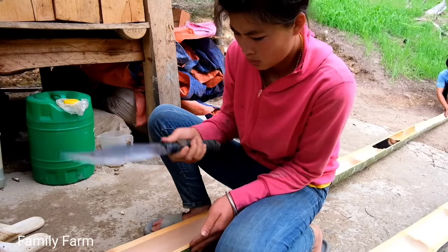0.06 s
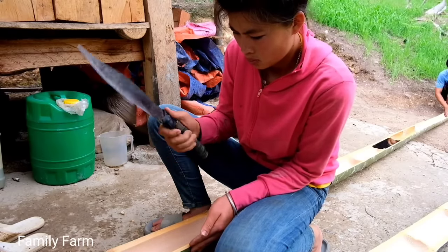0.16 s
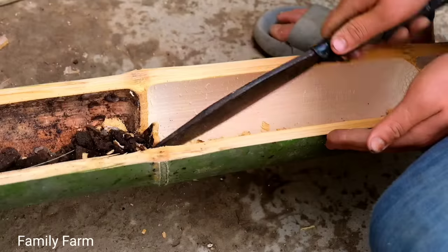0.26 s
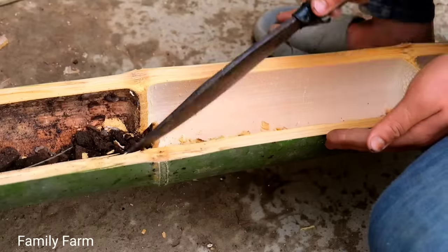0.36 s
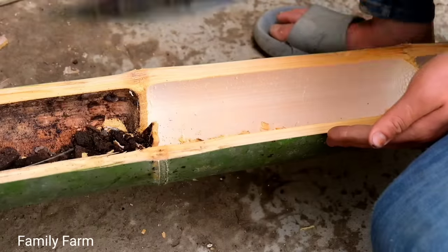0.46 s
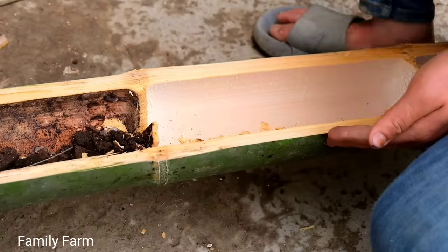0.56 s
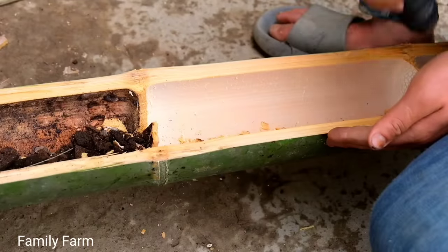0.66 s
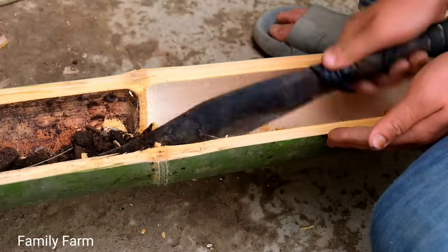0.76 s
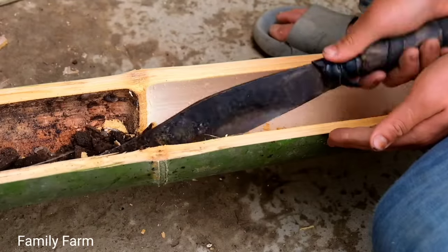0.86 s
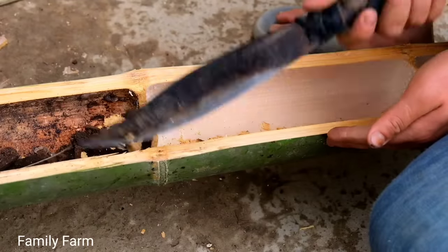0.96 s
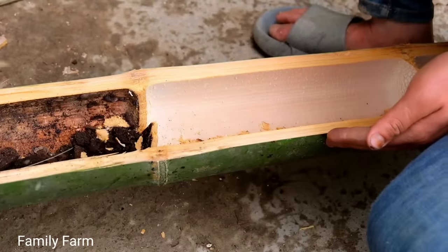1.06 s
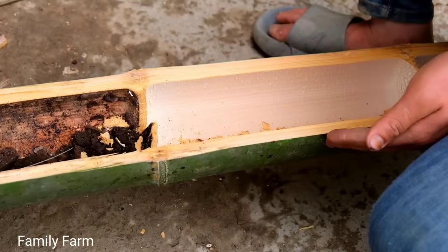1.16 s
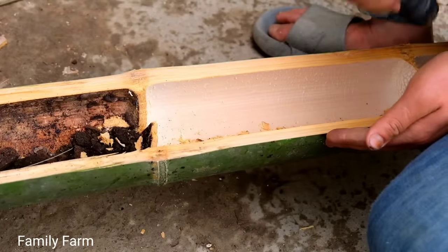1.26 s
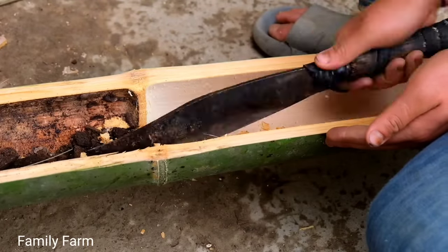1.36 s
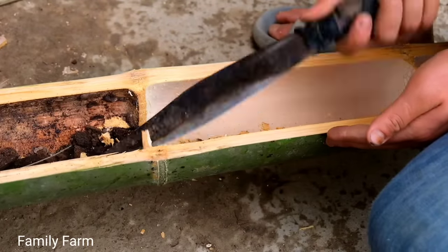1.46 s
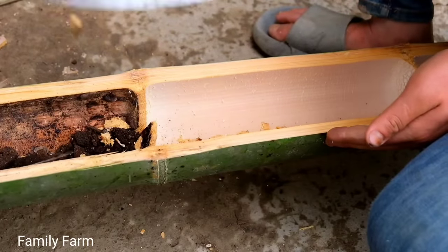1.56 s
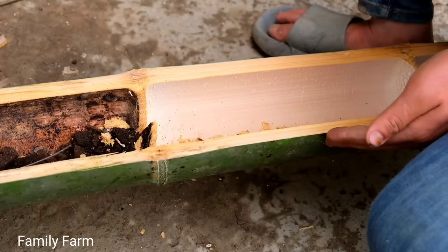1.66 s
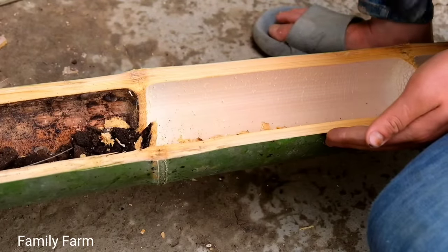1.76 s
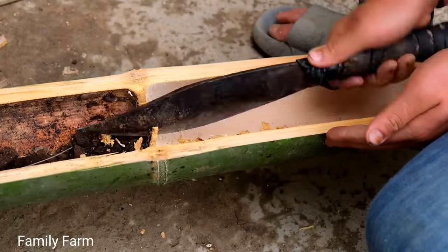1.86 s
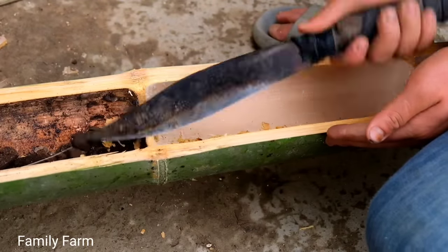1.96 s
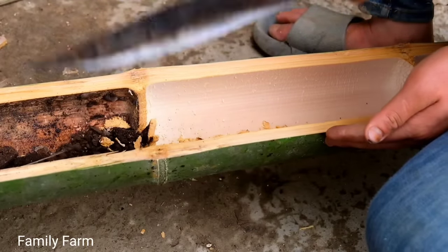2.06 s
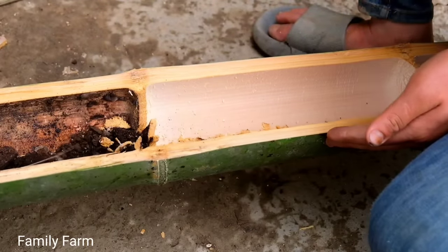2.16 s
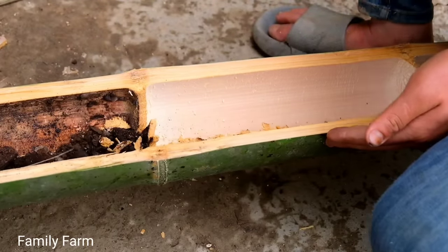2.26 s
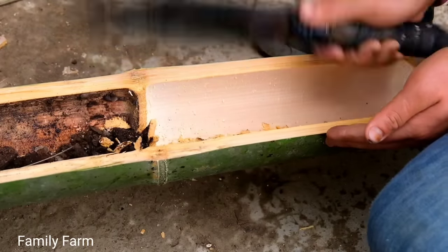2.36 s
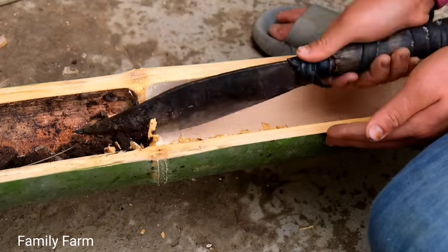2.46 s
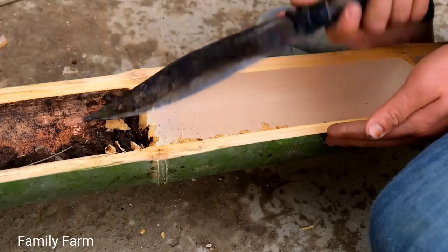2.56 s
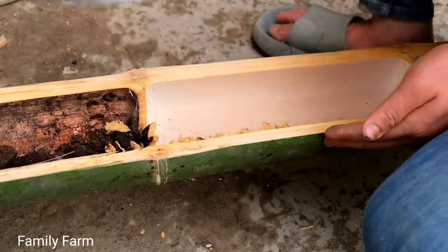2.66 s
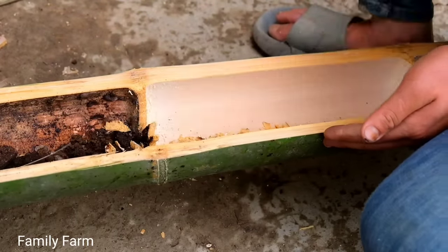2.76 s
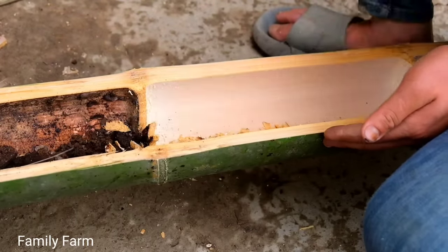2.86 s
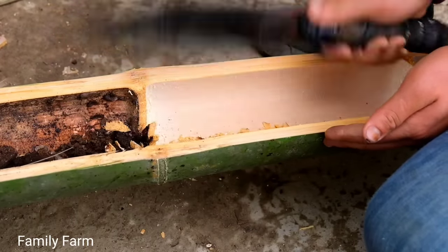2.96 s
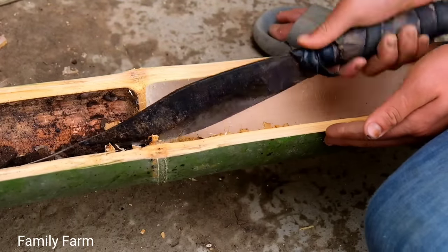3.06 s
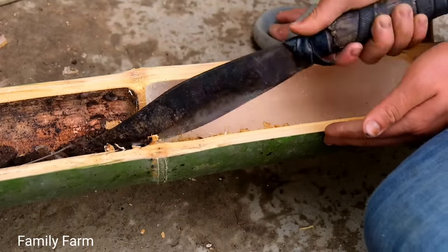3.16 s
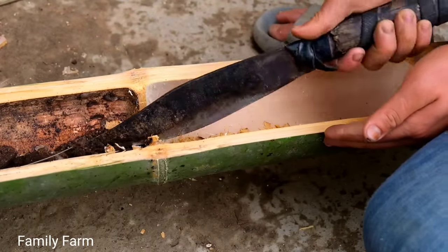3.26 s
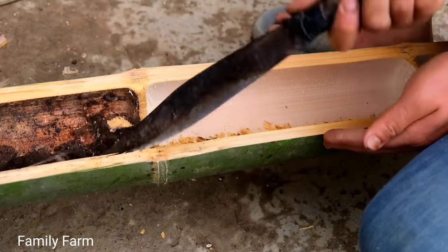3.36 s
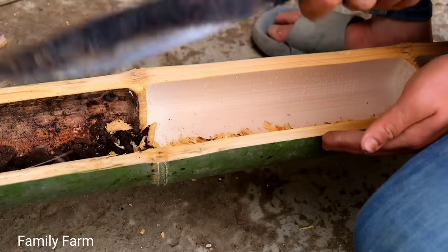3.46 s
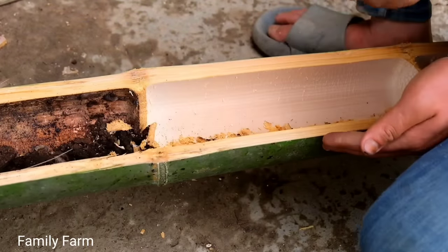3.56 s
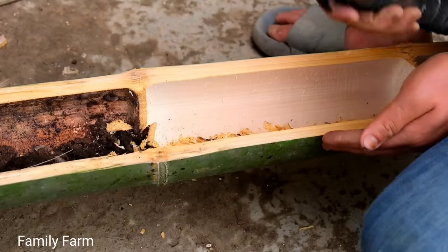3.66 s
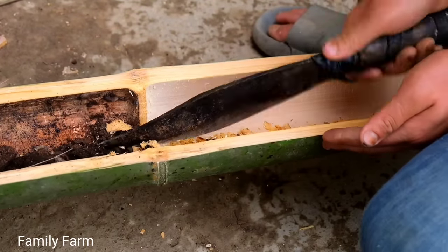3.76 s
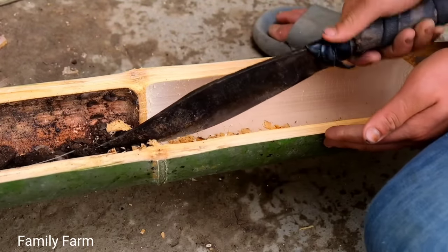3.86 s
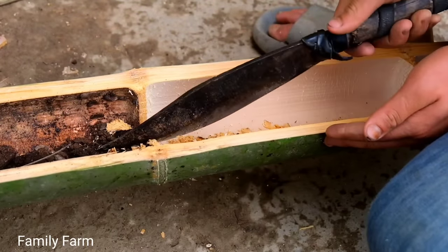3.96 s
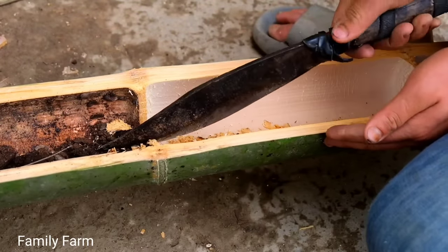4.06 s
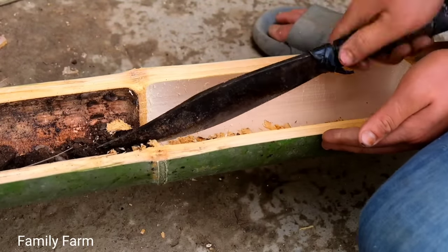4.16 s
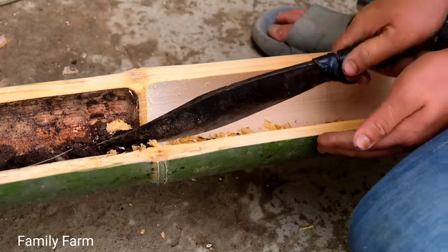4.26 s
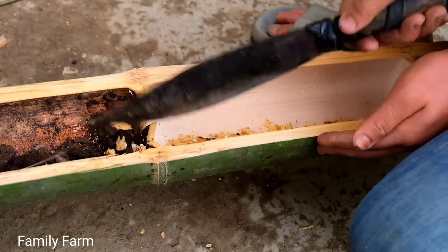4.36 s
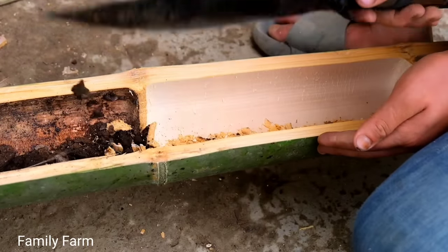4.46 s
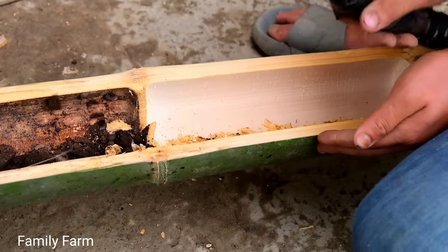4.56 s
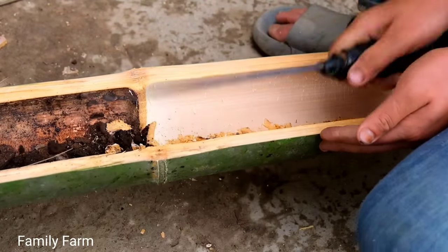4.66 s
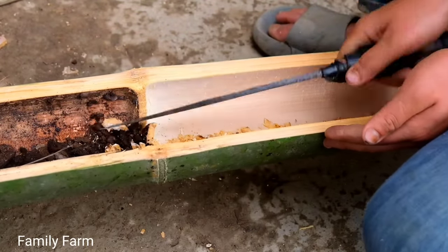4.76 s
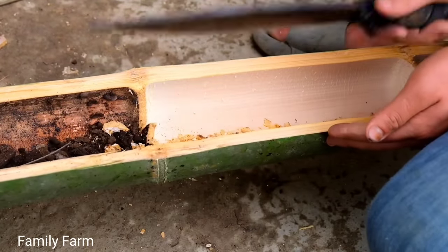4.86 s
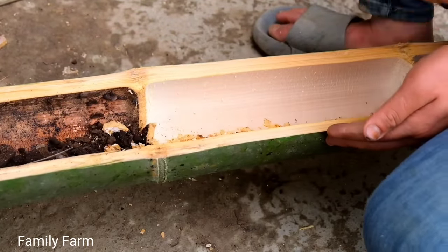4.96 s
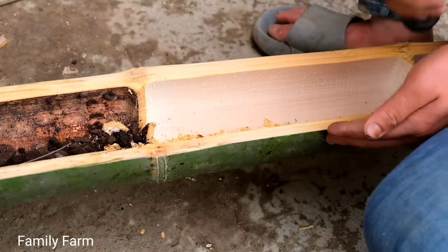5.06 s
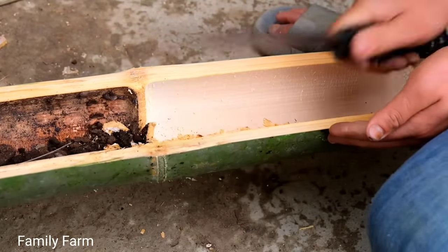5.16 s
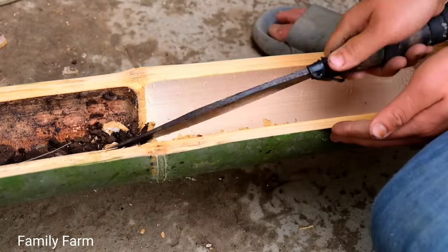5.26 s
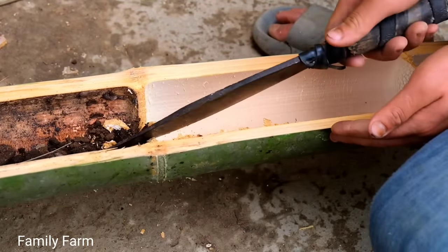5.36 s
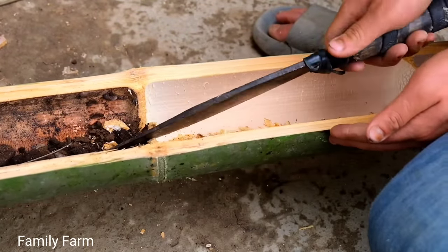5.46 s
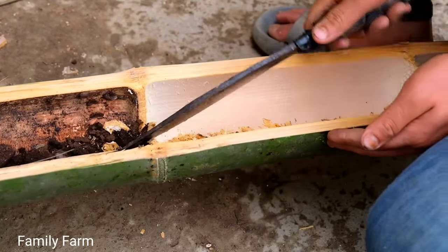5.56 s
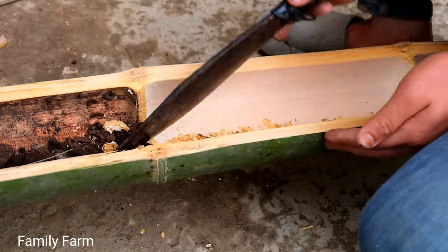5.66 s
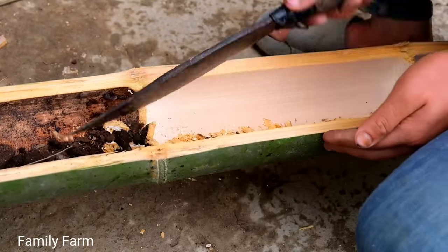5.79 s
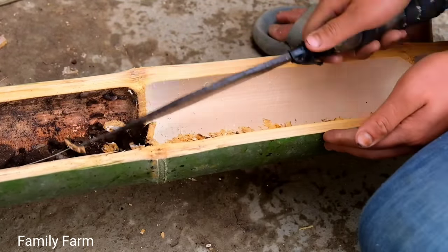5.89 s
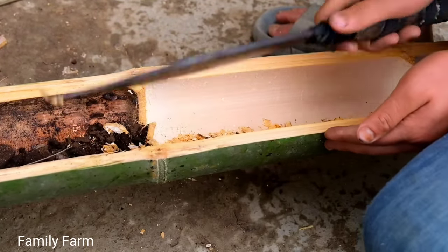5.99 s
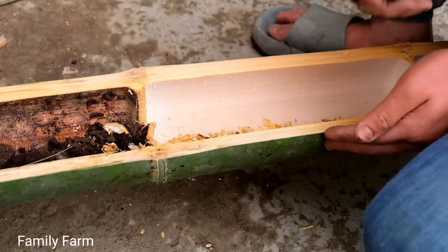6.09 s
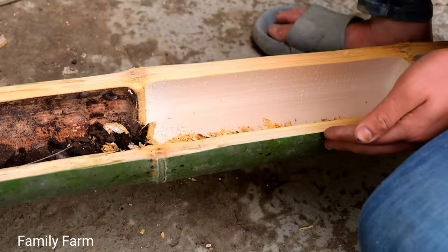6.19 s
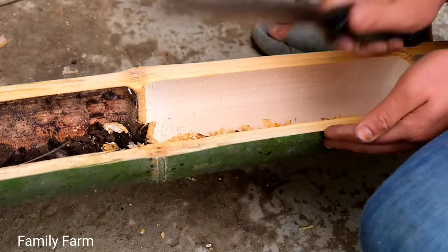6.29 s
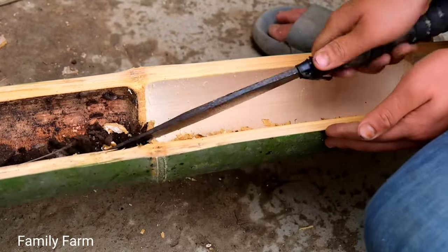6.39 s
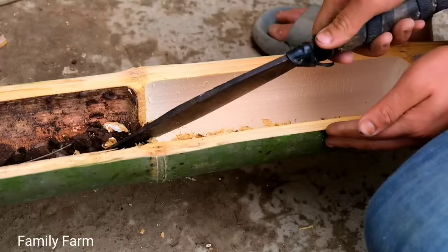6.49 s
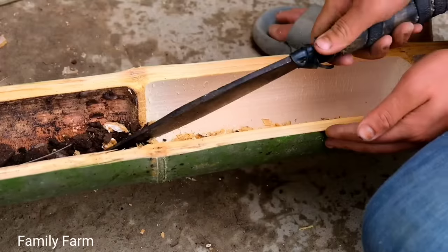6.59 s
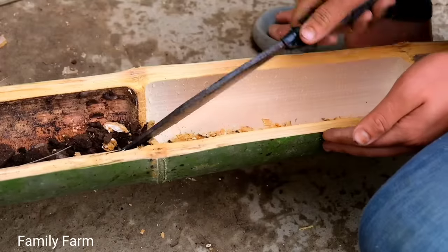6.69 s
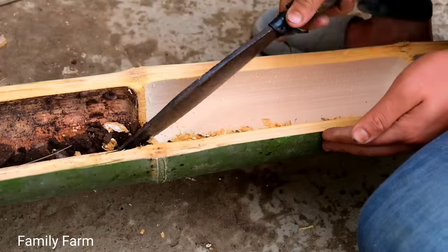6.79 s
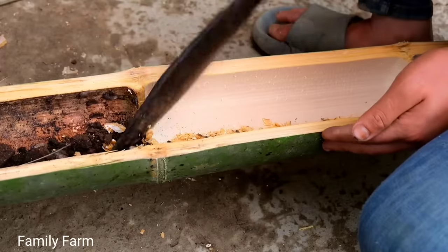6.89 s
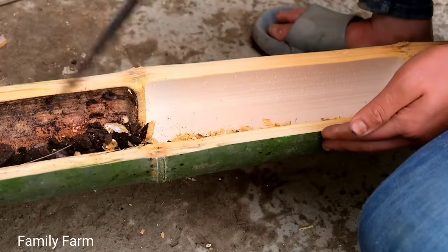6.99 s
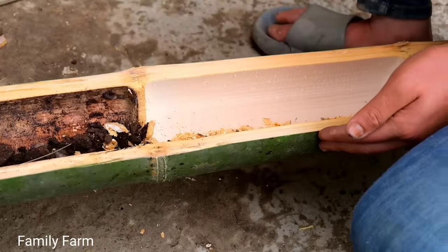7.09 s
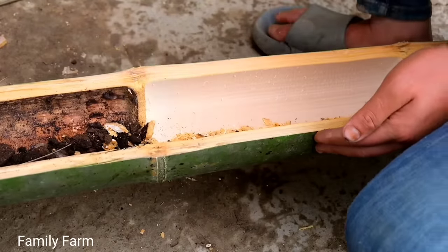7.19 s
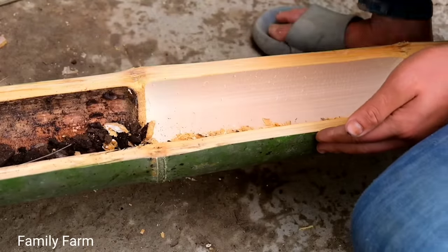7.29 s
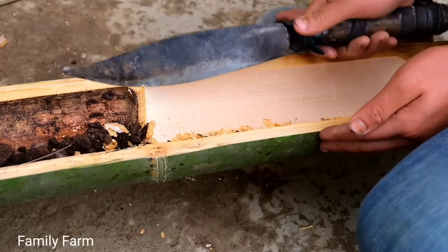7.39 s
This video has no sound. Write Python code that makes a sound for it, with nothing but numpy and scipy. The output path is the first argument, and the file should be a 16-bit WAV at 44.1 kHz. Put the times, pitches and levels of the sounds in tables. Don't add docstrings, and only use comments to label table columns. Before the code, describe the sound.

Outdoors in a concrete yard, a heavy blade strikes a hollow bamboo pole close to the microphone. Hard, abrupt cracks alternate with duller, slightly more distant knocks, roughly two main hits per second, with loose taps, gritty ticks and short fibre scrapes between. Insects, leaves and a low murmur stay faint, ducking after each blow. A cricket chirps midway and a hen clucks softly once.

```python
import sys
import numpy as np
from scipy import signal
from scipy.fft import rfft, irfft
from scipy.io import wavfile
from scipy.ndimage import uniform_filter1d

SR = 44100
rng = np.random.default_rng(int(sys.argv[2]) if len(sys.argv) > 2 else 0)


def how_loud(loudness_db):
    steps = np.asarray(loudness_db, float) / 20
    return 10 ** steps


def unload_audio(sound):
    columns = np.transpose(np.atleast_2d(sound))
    steps = np.round(np.clip(columns, -1, 1) * 32767)
    wavfile.write(sys.argv[1], SR, steps.astype(np.int16))


N = 327663

# pitch_hz, level_db
MURMUR = [(15, -51.5), (25, -21.5), (91, 1), (128, -10.5), (258, -2.5), (371, -5.5), (521, 2), (763, -2.5),
          (964, -1), (1640, -6.5), (2350, -9), (4000, -22), (5200, -39), (8800, -120)]
# pitch_hz, level_db
INSECTS = [(3600, -22), (4700, -4.5), (5300, -7), (6000, 1), (6750, -7), (7500, 1), (8330, -2.5),
           (8460, -29.5)]
# pitch_hz, level_db
LEAVES = [(1410, -31.5), (2400, -4.5), (3660, -6), (8330, -7), (8480, -15), (11000, -20.5), (15100, -29.5),
          (15800, -44)]
# pitch_hz, likeness (1 = same)
LIKENESS = [(60, 1), (180, 1.0), (550, 1), (1650, 0.39), (4970, -0.25), (15000, 1)]
# start_s, depth_db
GAIN_DIPS = [(-.07, 17.5), (0.36, 20), (0.85, 16.5), (1.12, 13), (1.384, 16.5), (1.526, 21), (1.95, 23.5),
             (2.115, 19), (2.45, 19), (2.651, 21), (3.034, 20), (3.273, 16), (3.429, 16.5), (3.849, 20),
             (4.321, 21), (4.791, 20.5), (5.0, 13), (5.246, 22.5), (5.509, 22), (5.895, 19), (5.979, 15.5),
             (6.253, 21), (6.389, 19), (6.532, 17.5), (6.895, 18.5), (7.041, 17)]
# start_s, hardest_s,
# end_s, body_db, rasp_db
SCRAPES = [(0.239, 0.288, 0.293, -39, -63.5), (2.568, 2.594, 2.645, -35, -37.5),
           (5.639, 5.686, 5.75, -48.5, -48.5), (5.725, 5.775, 5.85, -56, -41.5),
           (5.775, 5.845, 5.892, -37, -49), (6.332, 6.396, 6.387, -34.5, -52),
           (0.814, 0.83, 0.9, -50, -38.5), (0.163, 0.168, 0.16, -72, -56), (2.505, 2.52, 2.5, -62, -50.5),
           (3.168, 3.177, 3.19, -60.5, -53), (6.89, 6.914, 7.13, -60.5, -44.5)]
# start_s, hardest_s, end_s, body_db, rasp_db
FAR_SCRAPES = [
    (0.315, 0.342, 0.356, -43, -39.5),
    (1.127, 1.127, 1.116, -34, -42),
    (4.313, 4.319, 4.36, -37, -26.5),
    (4.752, 4.761, 4.8, -23.5, -38),
    (3.262, 3.271, 3.25, -40, -42),
    (4.891, 4.92, 4.99, -42, -42.5),
    (5.499, 5.503, 5.55, -41, -39),
    (6.24, 6.246, 6.265, -41, -30),
    (6.884, 6.891, 6.9, -35, -27.5),
]
# start_s, level_db, crack_db, edge_db, pitch_hz
TICKS = [(0.335, -37, -14, -52, 524), (0.926, -37.5, -16, -33.5, 536), (0.974, -37.5, -12, -28.5, 690),
         (1.465, -48.5, 6.5, -26, 616), (1.967, -39, -19, -11.5, 611), (1.996, -37.5, -1, -27, 693),
         (3.145, -52.5, -0.5, -18, 754), (3.367, -34, -0.5, -18, 635), (3.506, -42.5, -39, -34.5, 960),
         (5.662, -38.5, -14, -24.5, 904), (5.678, -35, -13, -13, 625), (5.732, -45.5, -4.5, -21, 533),
         (6.731, -34, -0.5, -23, 897), (6.793, -44.5, -3, 0, 1220), (7.329, -46, 1, -17, 985)]
# start_s, level_db, crack_db, edge_db, pitch_hz
KNOCKS = [(0.36, -7, -23.5, -15.5, 541), (1.127, -25, -29, -42, 732), (1.526, -8, -31, -30, 555),
          (2.115, -6.5, -21.5, -10, 536), (2.651, -10, -23.5, -23, 669), (2.907, -32, -29.5, -26.5, 660),
          (3.273, -11, -13.5, -18.5, 770), (3.851, -11, -47, -21.5, 735), (4.323, -4.5, -41, -16, 713),
          (4.792, -9.5, -38, -36.5, 693), (4.934, -25, -32, -9, 705), (5.028, -40, -17.5, -3, 991),
          (5.094, -37.5, -34.5, -21.5, 676), (5.509, -10, -27.5, -23, 700), (6.253, -9, -19, -41, 547),
          (6.532, -26, -11, -15, 978), (6.895, -9, -18.5, -20.5, 991)]
# start_s, level_db, crack_db, edge_db, pitch_hz
CHOPS = [
    (0.808, 4, -13, -24.5, 735),
    (1.383, 2, -3, -24.5, 593.5),
    (1.898, -2.5, 1.5, -21.5, 815),
    (2.45, 7, -14.5, -31.5, 582),
    (3.034, 3.5, -8.5, -27, 557.5),
    (3.814, 5.5, -27.5, -31.5, 887),
    (5.246, 2.5, -7.5, -32.5, 981),
    (6.389, 0, -20, -35, 852),
    (7.4278, -0.5, -18.5, -26, 1341),
]
# start_s, level_db, crack_db, edge_db, pitch_hz
TAPS = [
    (2.589, -18.5, -16, -33.5, 504),
    (2.603, -24.5, -17.5, -16.5, 1180),
    (3.429, -19, -22.5, -47, 462),
    (4.753, -10, -14.5, -55, 670),
    (5.807, -29, -21, -42, 690),
    (5.838, -25.5, -38.5, -52, 930),
    (5.895, -21.5, -16, -19, 474),
    (5.978, -20.5, -22, -60, 475),
    (7.042, -29, 0.5, -17.5, 3410),
]
# pitch_hz, level_db, die_away_s (to -60 dB)
TUBE = [(228, -25, .04), (310, -2.5, 0.013), (434.2, 14.5, 0.3)]
# pitch_hz, level_db, die_away_s
WALL = [(570, -6, 0.092), (670, -4, 0.05), (741.4, -2, 0.13), (837, -3, 0.089), (925.3, -1, 0.072),
        (1074, -14.5, 0.27), (1220, -8, 0.16), (1381, -5.5, 0.014), (1780, -3.5, 0.03), (1890, -10, 0.041),
        (2183, -14, 0.046)]
# pitch_hz, level_db, die_away_s
BLADE = [(4970, -2.5, .06), (5282, 1.5, 0.043), (7050, -6.5, 0.035), (8980, 0.5, 0.014), (10760, 4, 0.027),
         (11100, -1, 0.019), (13900, -1, 0.085), (17100, -6, .03)]
# pitch_hz, level_db, die_away_s
SPINE = [(11050, 1, .16), (13750, -6, .1)]
# pitch_hz, level_db, die_away_s
GRIT = [(9480, -3, .01), (10220, -2.5, .01), (11000, -6, 0.11), (12200, -2, .01), (12400, 8, .01),
        (13750, -5, .07), (14640, 7, .01)]
# pitch_hz, level_db, die_away_s
RIM = [(1675, 1, 0.069), (1720, 5, 0.027), (2074, 5, 0.065), (2430, -0.5, 0.014), (2710, -0.5, 0.024),
       (2764, -6, 0.18)]
# pitch_hz, level_db
CRACK = [(500, -19), (1500, 2), (2500, -1), (5000, -3.5), (8000, -10), (12000, -16.5), (15500, -25.5),
         (17000, -32)]
# pitch_hz, level_db
AIR = [(1000, 0), (2500, -3), (5000, -6), (8000, -10), (11000, -12.5), (16000, -16)]
# start_s, level_db
CHIRPS = [
    (4.025, -1.5),
    (4.1, 0),
    (4.185, -1.5),
    (4.275, -6),
    (4.36, -7.5),
    (4.455, -4),
    (4.535, -0.5),
    (4.62, -0.5),
]
# length_s, start_hz, end_hz, blur_samples
TRILL = (0.061, 4170, 5700, 29)
# length_s, start_hz, end_hz, blur_samples
ANSWER = (0.058, 6850, 6700, 150)
# time_s, pitch_hz, level_db
HEN = [
    (4.54, 371, -58),
    (4.585, 365, -50.5),
    (4.61, 356.6, -41.5),
    (4.628, 362, -66),
]
# pitch_hz, lead_radians
LEAD = [(50, .05), (500, 0.15), (1500, 0.8), (3000, 1.24), (8000, 1.4), (15000, 1.4)]
# pitch_hz, level_db
MIC_TREBLE = [(15300, -1), (16500, -16)]
# pitch_hz, die_away_s
ECHO = [(200, 0.075), (700, 0.2), (2000, 0.2), (6000, 0.09), (14000, 0.043)]


def evened(x):
    return x / np.sqrt(np.mean(x ** 2) + 1e-20)


def topped(x):
    return x / (abs(x).max() + 1e-20)


def read(points, hz):
    f, value = np.transpose(points)
    return np.interp(np.log(hz + 1), np.log(f + 1), value)


def add(mix, start_s, sound):
    part = mix[round(start_s * SR):][:len(sound)]
    part += sound[:len(part)]


def coloured(x, points):
    gain = how_loud(read(points, np.fft.rfftfreq(len(x), 1 / SR)))
    return irfft(rfft(x) * gain, len(x))


def dips():
    sudden_s, sudden_db = 0.293, 14
    climb_db_per_s = 54
    start_s, depth_db = np.transpose(GAIN_DIPS + [(sudden_s, sudden_db)])[:, :, None]
    fall_s = np.where(start_s == sudden_s, 0.003, 0.066)
    at = np.arange(0, N + 64, 64)
    since_s = at / SR - start_s
    left_db = depth_db - climb_db_per_s * np.maximum(since_s - fall_s, 0)
    lost_db = np.clip(since_s / fall_s, 0, 1) * np.maximum(left_db, 0)
    return np.interp(np.arange(N), at, lost_db.max(0))


def wash(points, level_db, patchy_db):
    frames, hz = N // 256 + 5, np.fft.rfftfreq(1024, 1 / SR)
    a, b, c, d, patches = rng.standard_normal((frames, 513, 5)).T
    patches = uniform_filter1d(patches, size=10, axis=0)
    patches = evened(uniform_filter1d(patches, size=12, axis=1))
    same = np.clip(read(LIKENESS, hz), -1, 1)[:, None]
    left, other = a + 1j * b, c + 1j * d
    z = np.array([left, same * left + np.sqrt(1 - same ** 2) * other])
    z *= how_loud(read(points, hz)[:, None] + patchy_db * patches)
    noise = evened(signal.istft(z, nperseg=1024, noverlap=768)[1][:, :N])
    return noise * how_loud(level_db)


def yard(lost_db):
    sound = wash(MURMUR, -50 - 0.35 * lost_db, patchy_db=2.54)
    sound += wash(INSECTS, -52 - lost_db, patchy_db=1.5)
    return sound + wash(LEAVES, -53.5 - 0.75 * lost_db, patchy_db=0.9)


def ring(modes, push, spread_db=1.5, detune=0.03, sustain=0.62):
    t = np.arange(6000) / SR
    hz, db, die_s = np.transpose(modes)[:, :, None]
    louder, sharper = rng.standard_normal((len(modes), 2, 1)).transpose(1, 0, 2)
    turn = 2 * np.pi * hz * (1 + detune * sharper) * t
    share = abs(np.exp(1j * turn[:, :len(push)]) @ push)[:, None] + 0.088 * np.linalg.norm(push)
    fade_db = -60 * t / (die_s * sustain)
    tone = how_loud(db + spread_db * louder + fade_db) * np.sin(turn) / share
    return topped(signal.fftconvolve(tone.sum(0), push)[:6000])


def scrape(start_s, hardest_s, end_s, body_db, rasp_db):
    swell_db, ease_db = 13.5, 16
    t = np.arange(start_s, max(end_s, hardest_s + 0.002), 1 / SR)
    press = how_loud(np.interp(t, [start_s, hardest_s, t[-1] + 0.001], [-swell_db, 0, -ease_db]))
    slips = rng.standard_normal((2, len(t))) * how_loud(2.7 * rng.exponential(1, len(t)))
    pole = how_loud(-10.5) * ring(TUBE[1:], np.ones(1)) + ring(WALL, np.ones(1))
    pole *= how_loud(-60 * np.arange(6000) / SR / 0.098)
    body = evened(signal.fftconvolve(slips[0], pole)[:len(t)]) * how_loud(body_db)
    rasp = evened(coloured(slips[1], CRACK)) * how_loud(rasp_db)
    return start_s, (body + rasp) * press * signal.windows.tukey(len(t), 0.3)


def blow(row, edge, edge_db, edge_s, steel_db, rise_s, bite_s, crack_s, fizz_db,
         tube_db, tube_sustain, damp, sustain, rattle_db, note_s):
    start_s, level_db, crack_db, ring_db, pitch_hz = row
    t = np.arange(6000) / SR
    force = (t / rise_s) * np.exp(1 - t / rise_s)
    force += 0.78 * np.exp(-((t - bite_s) / (0.8 * bite_s)) ** 2)
    fibres = rng.standard_normal((3, len(t))) * how_loud(3.08 * rng.exponential(1, len(t)))
    rattle = how_loud(rattle_db - 60 * t / 0.091) * (t > rise_s)
    push = fibres[0] * (force + rattle)
    crack = coloured(fibres[1], CRACK) * force * how_loud(-60 * t / crack_s)
    fizz = coloured(coloured(fibres[2], CRACK), AIR) * how_loud(fizz_db - 60 * t / 0.098) * (t > rise_s)
    wall = ring(WALL + [(pitch_hz, 7, note_s)], push, sustain=sustain)
    wood = wall + how_loud(tube_db) * ring(TUBE, push, detune=0.014, sustain=tube_sustain)
    held = damp + (1 - damp) * np.exp(-(t / (1.66 * bite_s)) ** 4)
    jolt = push * how_loud(-60 * t / edge_s)
    steel = how_loud(crack_db + steel_db) * ring(BLADE, jolt, detune=0.0029)
    rim = how_loud(ring_db + edge_db) * ring(edge, jolt, detune=0.001) * np.sqrt(held)
    snap = how_loud(crack_db + 13) * topped(crack + fizz)
    return start_s - rise_s, how_loud(level_db) * ((wood + steel) * held + rim + snap)


def blows(rows, **touch):
    track = np.zeros(N)
    for row in rows:
        add(track, *blow(row, **touch))
    return track


def ticks():
    return blows(TICKS, edge=GRIT, edge_db=10.5, edge_s=0.0057, steel_db=-8, rise_s=0.0007, bite_s=0.0047,
                 crack_s=0.03, fizz_db=-3, tube_db=-22, tube_sustain=0.89, damp=0.94, sustain=0.93,
                 rattle_db=-19, note_s=0.09)


def knocks():
    return blows(KNOCKS, edge=RIM, edge_db=7.5, edge_s=0.13, steel_db=-30.5, rise_s=0.0036, bite_s=0.0082,
                 crack_s=0.19, fizz_db=-3.5, tube_db=-29.5, tube_sustain=0.66, damp=0.95, sustain=0.5,
                 rattle_db=-4, note_s=0.049)


def thud(start_s, level_db):
    t = np.arange(3000) / SR
    pitch_hz, rise_s = 151, 0.003
    push = (t / rise_s) * np.exp(1 - t / rise_s)
    return start_s, how_loud(level_db - 27) * push * np.sin(2 * np.pi * pitch_hz * t)


def chops():
    return blows(CHOPS, edge=SPINE, edge_db=-5, edge_s=0.0024, steel_db=2.5, rise_s=0.0005, bite_s=0.0047,
                 crack_s=0.022, fizz_db=-40.5, tube_db=-11, tube_sustain=0.5, damp=0.21, sustain=0.85,
                 rattle_db=-22.5, note_s=0.048)


def taps():
    return blows(TAPS, edge=SPINE, edge_db=1, edge_s=0.0042, steel_db=-6, rise_s=0.00066, bite_s=0.0039,
                 crack_s=0.03, fizz_db=-6, tube_db=-11.5, tube_sustain=0.79, damp=1.0, sustain=0.77,
                 rattle_db=-16.5, note_s=0.125)


def chirp(start_s, level_db, length_s, from_hz, to_hz, blur_samples):
    t = np.arange(0, length_s, 1 / SR)
    blur = evened(uniform_filter1d(rng.standard_normal(len(t)), size=int(blur_samples)))
    pitch_hz = from_hz + (to_hz - from_hz) * t / length_s
    glide = np.sin(2 * np.pi * np.cumsum(pitch_hz) / SR)
    return start_s, how_loud(level_db) * evened(glide * (0.21 + blur)) * signal.windows.tukey(len(t), 0.6)


def cricket():
    track = np.zeros(N)
    for start_s, level_db in CHIRPS:
        add(track, *chirp(start_s, level_db - 45, *TRILL))
        add(track, *chirp(start_s - 0.018, level_db - 47.5, *ANSWER))
    return track


def hen():
    time_s, pitch_hz, level_db = np.transpose(HEN)
    t = np.arange(time_s[0], time_s[-1], 1 / SR)
    turns = np.cumsum(np.interp(t, time_s, pitch_hz)) / SR
    voice = np.zeros(len(t))
    for k, overtone_db in enumerate([-3, -6, -12, -28, -14], 1):
        voice += how_loud(overtone_db) * np.sin(2 * np.pi * k * turns)
    return time_s[0], voice * how_loud(np.interp(t, time_s, level_db))


def thin(x, hz):
    return signal.sosfilt(signal.butter(3, hz, "high", fs=SR, output="sos"), x)


def ports(x, pan_db):
    size = N + 999
    hz = np.fft.rfftfreq(size, 1 / SR)
    turn = np.exp(0.5j * read(LEAD, hz))
    z = rfft(x, size) * how_loud(read(MIC_TREBLE, hz))
    left = irfft(z / turn, size)[:N] * how_loud(pan_db / 2)
    right = irfft(z * turn, size)[:N] * how_loud(-pan_db / 2)
    return np.array([left, right])


def echoes(x):
    bounces = np.zeros((2, SR // 2))
    at = np.arange(200, SR // 2 - 20, 20) + rng.integers(0, 20, (2, (SR // 2 - 201) // 20))
    np.put_along_axis(bounces, at, rng.choice([-1., 1.], at.shape), 1)
    hz, t, z = signal.stft(bounces, SR, nperseg=256)
    same = np.clip(read(LIKENESS, hz), 0, 1)[:, None]
    z[1] = same * z[0] + np.sqrt(1 - same ** 2) * z[1]
    fade = how_loud(-60 * t / read(ECHO, hz)[:, None])
    tail = signal.istft(z * fade, SR, nperseg=256)[1]
    return signal.fftconvolve(x[None], tail / np.linalg.norm(tail[0]), axes=1)[:, :N]


def scene():
    lost_db = dips()
    near = ticks() + chops() + taps()
    for row in SCRAPES:
        add(near, *scrape(*row))
    near = thin(near, hz=210)
    far = knocks()
    for row in FAR_SCRAPES:
        add(far, *scrape(*row))
    far = thin(coloured(far, AIR), hz=384)
    for row in KNOCKS:
        add(far, *thud(*row[:2]))
    far += cricket() * how_loud(-lost_db)
    add(far, *hen())
    direct = ports(near, pan_db=-0.2) + ports(far, pan_db=-1.1)
    to_walls = how_loud(-25.5) * coloured(near, AIR) + how_loud(-13) * far
    return direct + echoes(to_walls) + yard(lost_db)


def band_limit(x):
    return signal.sosfilt(signal.butter(12, 16480, fs=SR, output="sos"), x)


def record(dry):
    overloaded = np.clip(dry, -0.98, 0.98)
    low_cut = signal.butter(1, 70, "high", fs=SR)
    mix = signal.lfilter(*low_cut, overloaded)
    return band_limit(mix)


dry = scene()
out = record(dry)
unload_audio(out)
```